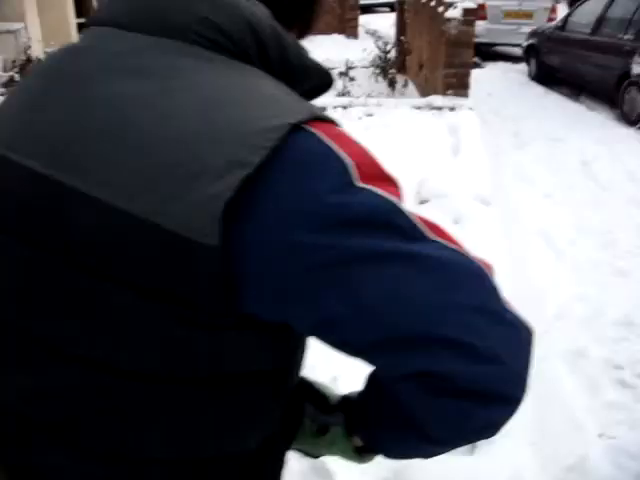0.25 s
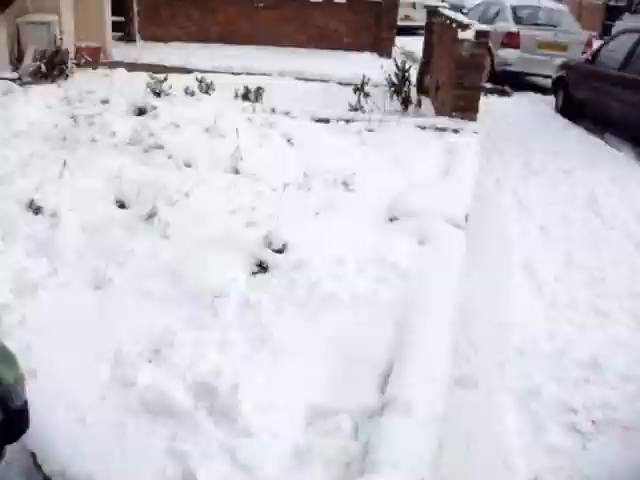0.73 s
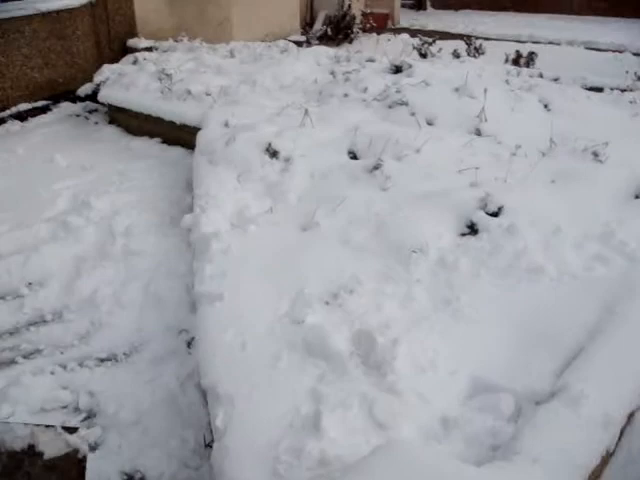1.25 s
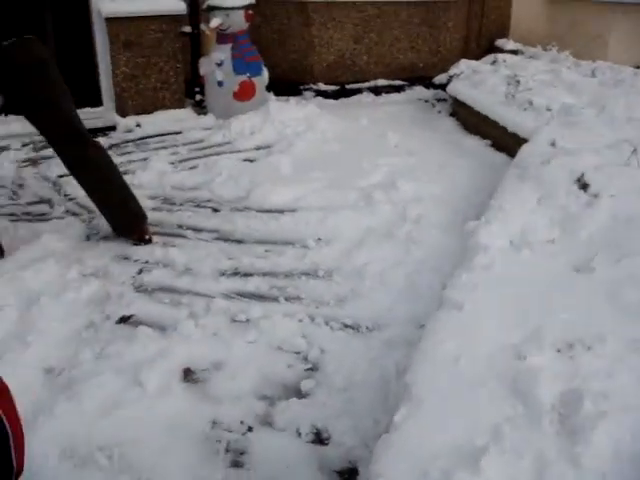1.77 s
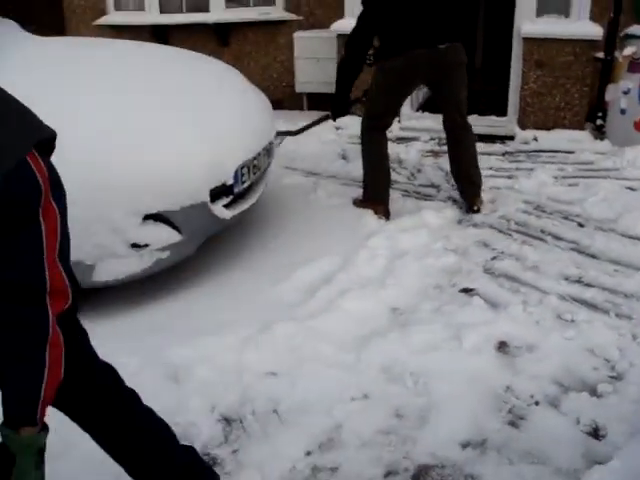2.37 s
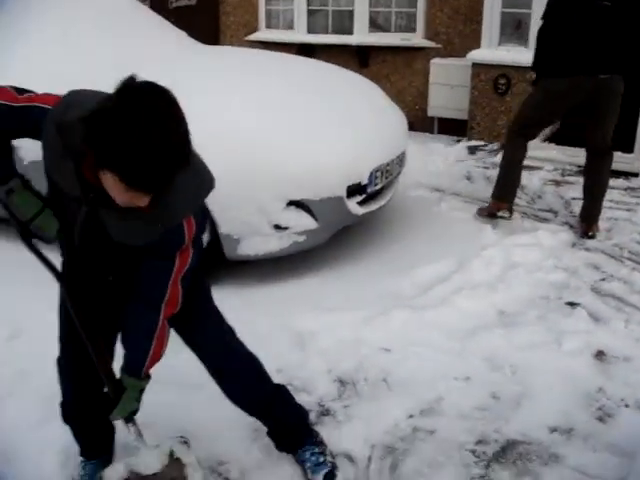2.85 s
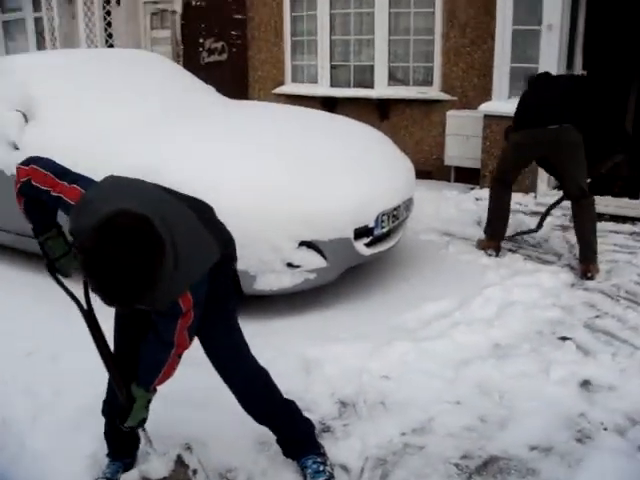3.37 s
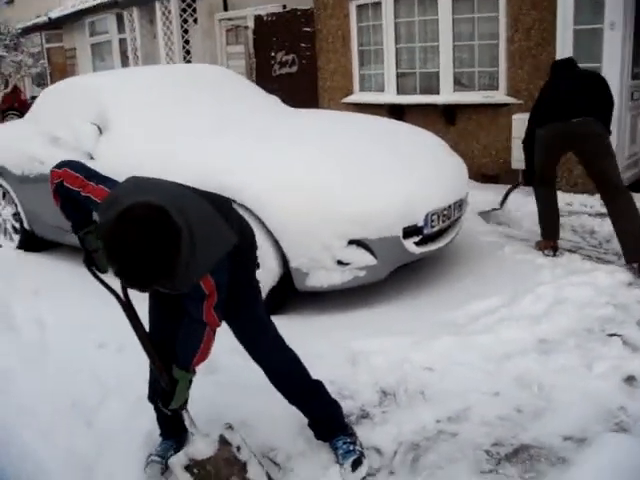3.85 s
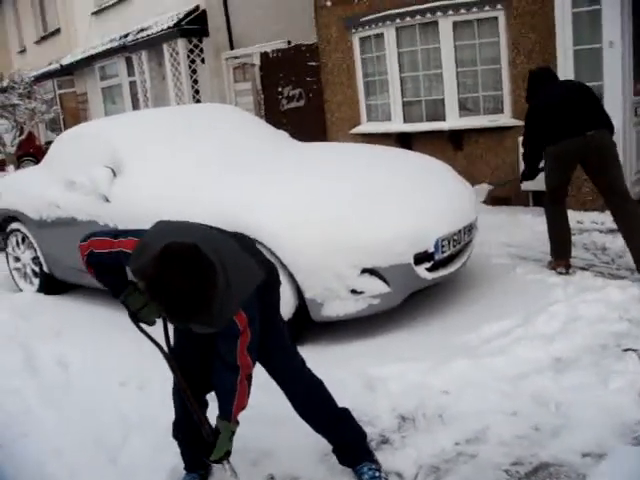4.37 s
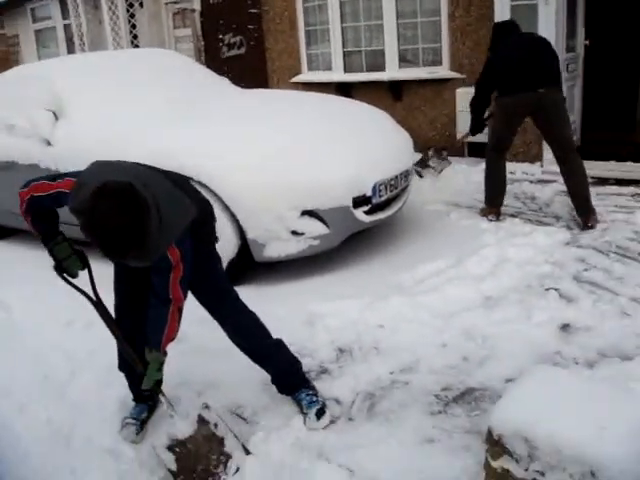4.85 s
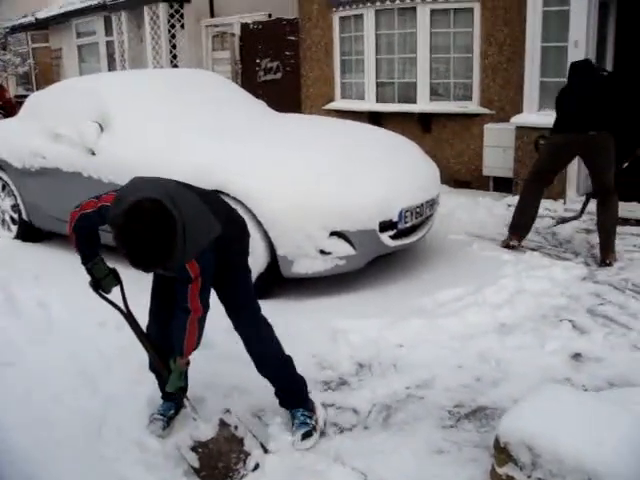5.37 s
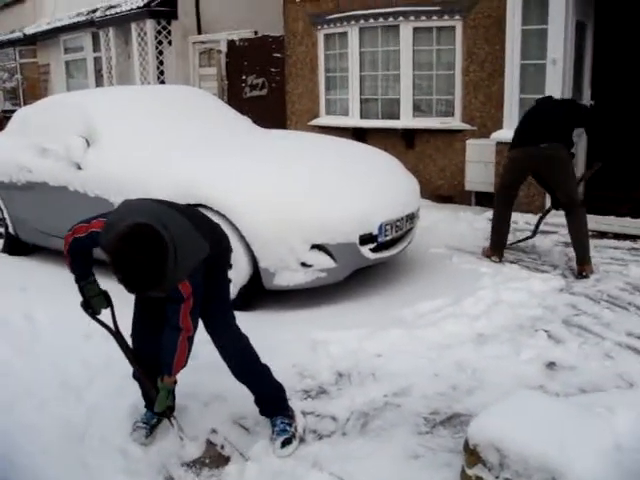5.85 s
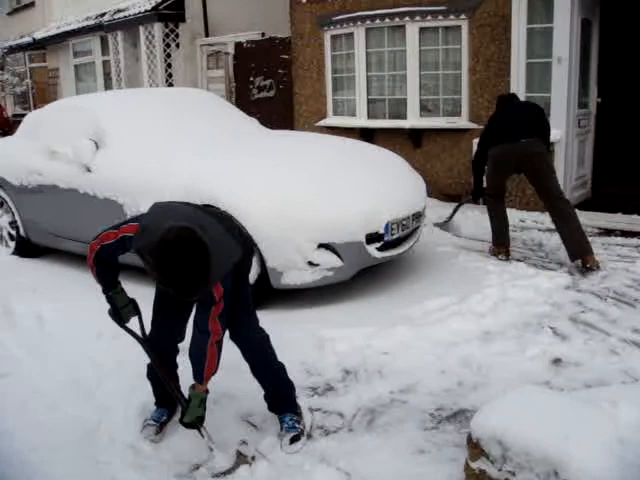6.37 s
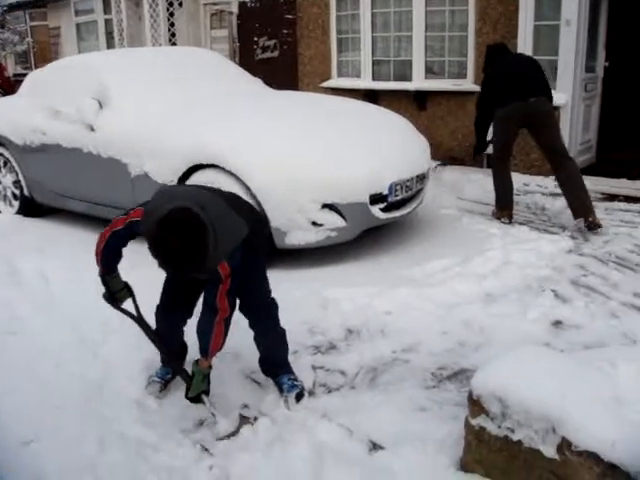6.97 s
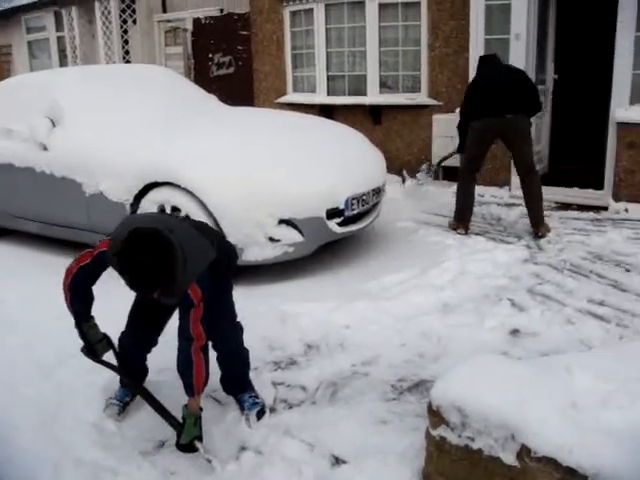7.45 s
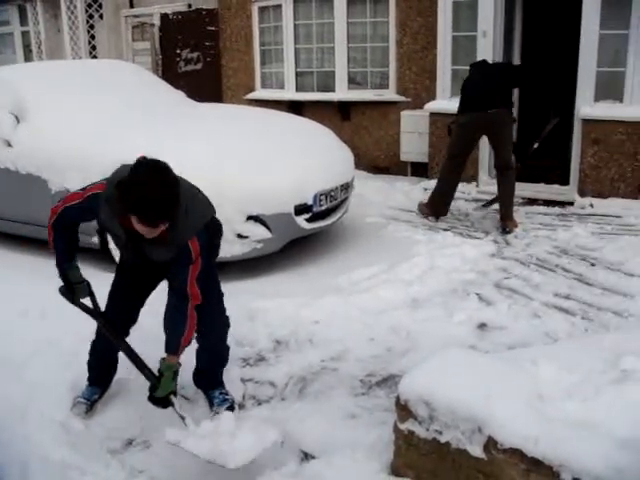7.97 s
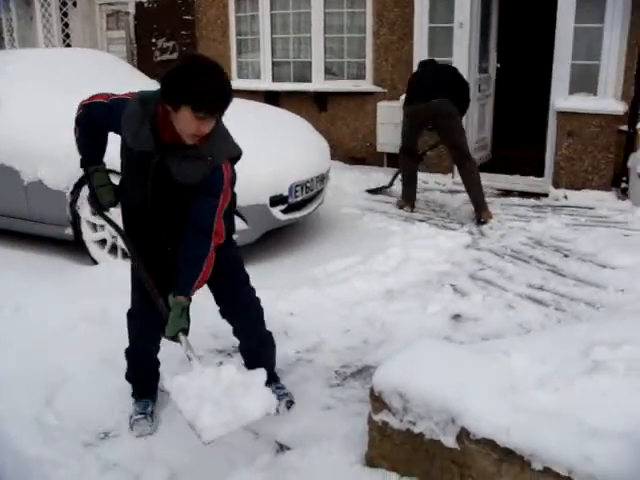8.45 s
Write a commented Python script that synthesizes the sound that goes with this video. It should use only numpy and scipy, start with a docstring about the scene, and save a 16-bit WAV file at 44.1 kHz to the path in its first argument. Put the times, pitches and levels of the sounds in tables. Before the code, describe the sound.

Steel shovel edges knock and drag on gritty paving in four short scraping strokes, each stuttering, hissing and catching with hollow metallic tones. Between them come sharp blade chops, soft snow crunches, footsteps in snow and sleeve rustle. The yard is quiet, with a faint distant murmur and thin wavering tone. A handheld microphone picks up low bumps and a little reflection from the house front.

```python
"""Paving outside a house: shovels clear snow. Steel edges scrape in long strokes, chop and bounce on the stone,
and loose snow and boots crunch between the strokes. Cloth rustles, the street murmurs, a faint tone wavers,
and wind and hands rumble at the microphone. Noise made of small grains drives the resonances of the blade,
clods are short noise clumps, and shaped noise makes the background."""
import sys
import numpy as np
from scipy import signal
from scipy.fft import rfft, irfft, next_fast_len
from scipy.io import wavfile
from scipy.ndimage import uniform_filter1d, map_coordinates

SR = 44100
rng = np.random.default_rng(int(sys.argv[2]) if len(sys.argv) > 2 else 0)


def transcribe(signal):
    """Save signal, clipped to [-1, 1], as a 16-bit WAV file at the path in sys.argv[1]."""
    frames = np.atleast_2d(signal).T
    limited = np.clip(frames, -1, 1)
    pcm = np.round(limited * 32767).astype(np.int16)
    wavfile.write(sys.argv[1], SR, pcm)


N = 384111  # length in samples

# The upper resonances of the blade. Each row: pitch in Hz, width in Hz (narrow ones are widened later),
# relative level in dB.
UPPER_MODES = [(890, 51, -24.5), (979, 22.3, 8.5), (1105, 200, -2), (1224, 15, 9.5), (1429, 40, 7),
               (1458, 13, -11.5), (1613, 37, 5.5), (1817, 25, 9.5), (2176, 37, 2.5), (2294, 17, 9),
               (2440, 35, -1), (2780, 81, -2), (2750, 26, 4), (3057, 24, 8), (3345, 19, 3), (3890, 38, 6)]
# The bright hiss of snow and edge. Each row: frequency in Hz, relative level in dB.
HISS = [(1410, -22.5), (2400, -14.5), (3130, -5), (3700, 1.5), (4220, 1), (6740, 2), (9150, -2.5),
        (10100, -10.5), (13100, -89), (22000, -120)]
# The broad grating under the resonances. Each row: frequency in Hz, relative level in dB.
BODY = [(200, -18.5), (300, -15), (400, 0.5), (700, 6.5), (1500, 4.5), (2800, 4), (4000, -46.5)]


def amp(db):
    """Turn decibels into a plain factor."""
    return 10 ** (np.asarray(db) / 20)


def unit(x):
    """Scale a sound to an rms level of 1."""
    return x / np.sqrt(np.mean(x ** 2) + 1e-20)


def along(points, hz):
    """Read a curve of (Hz, value) points on a logarithmic frequency axis."""
    f, v = np.transpose(points)
    return np.interp(np.log(hz + 1), np.log(f + 1), v)


def curves(tables):
    """Give one value per sample for each column after the time, over all tables in turn."""
    s, *columns = np.concatenate(tables).T
    return [np.interp(np.arange(N) / SR, s, column) for column in columns]


def wobble(rate, depth_db=None):
    """A smooth random curve with rate knots a second; with a depth, a gain that wavers by it."""
    step = 32  # samples between computed points
    knots = rng.standard_normal(int(N * rate / SR) + 4)
    coarse = map_coordinates(knots, [np.arange(0, N + step, step) * rate / SR])
    if depth_db is not None:
        coarse = amp(depth_db * coarse)
    return np.interp(np.arange(N) / step, np.arange(len(coarse)), coarse)


def swells(times, half, level_db, sizes=amp):
    """A curve of bell-shaped swells; sizes turns each level into a height."""
    step = 32  # samples between computed points
    t = np.arange(0, N + step, step) / SR
    bells = sum(sizes(db) * np.exp(-.5 * ((t - s) / h) ** 2) for s, h, db in zip(times, half, level_db))
    return np.interp(np.arange(N) / SR, t, bells)


def bursts(times, level_db, t60, rise):
    """An envelope that jumps at each time and dies away by 60 dB in t60 seconds."""
    out, t = np.zeros(N + SR), np.arange(SR // 4) / SR
    for s, db, life, up in np.broadcast(times, level_db, t60, rise):
        attack = (1 - np.exp(-t / max(up, 1 / SR))) ** 2
        decay = np.exp(-np.log(1000) * t / max(life, .005))
        out[round(s * SR):][:len(t)] += amp(db) * decay * attack
    return out[:N]


def filtered(x, response):
    """Multiply the spectrum of x by a response that depends on frequency."""
    m = next_fast_len(N + SR // 2)
    return irfft(rfft(x, m) * response(np.fft.rfftfreq(m, 1 / SR)), m)[..., :N]


def colour(points):
    """The response of a smooth spectrum."""
    return lambda f: amp(along(points, f))


def modes(table):
    """The response of a set of resonances; snow on the blade damps even the sharpest."""
    least_hz = 28  # no resonance is narrower

    def response(f):
        total = 0
        for k, (centre, width, db) in enumerate(table):
            loss = 1j * f * max(width, least_hz)
            total = total + (-1) ** k * amp(db) * loss / (centre * centre - f * f + loss)
        return total
    return response


def power_gain(response):
    """The rms gain of a response for white noise."""
    return np.sqrt(np.mean(np.abs(response(np.arange(1, SR // 2))) ** 2))


def driven(source, response, envelope):
    """The envelope drives a body whose steady answer to white noise has rms 1."""
    return filtered(source * envelope, response) / power_gain(response)


def shifting(table, source, envelope, depth_db, rate):
    """The contact point wanders along the edge, so every mode swells and fades on its own."""
    least_hz, never_still = 38, 1e-9  # least width of a mode; a trace of drive that never stops
    push, total = source * (envelope + never_still), 0
    for k, (hz, width_hz, db) in enumerate(table):
        b, a = signal.iirpeak(hz, hz / max(width_hz, least_hz), SR)
        total = total + (-1) ** k * amp(db) * signal.lfilter(b, a, push * wobble(rate, depth_db))
    return total / power_gain(modes(table))


def grit(per_s, spread_db, smooth):
    """Ice grains break at random moments and sizes over a smooth share of noise."""
    breaks = rng.random(N) < per_s / SR
    snaps = breaks * amp(spread_db * rng.standard_normal(N)) * rng.standard_normal(N)
    share = np.clip(smooth, 0, 1)
    return np.sqrt(1 - share) * unit(snaps) + np.sqrt(share) * rng.standard_normal(N)


def patchy(x, depth_db):
    """Make a sound louder and softer in random patches of time and frequency."""
    z = signal.stft(x, nperseg=256)[2]
    field = uniform_filter1d(uniform_filter1d(rng.standard_normal(z.shape), 5, 0), 7, 1)
    return signal.istft(z * amp(depth_db * unit(field)), nperseg=256)[1][:N]


def tone(hz, width_hz):
    """A fuzzy steady tone: noise in a narrow band around one pitch."""
    return unit(filtered(rng.standard_normal(N), lambda f: 1 / (1 + ((f - hz) / width_hz) ** 2)))


def around():
    """Street murmur, rustling cloth and snow are patchy shaped noise; a faint tone wavers."""
    # Sound between the strokes. Each row: time in seconds, murmur level in dB, rustle level in dB.
    levels = [
        [(0.0, -52, -46.5), (0.52, -49.5, -47.5), (0.722, -43.5, -44), (0.94, -48.5, -46.5), (1.17, -48, -47)],
        [(1.87, -54, -44), (2.084, -45, -43), (2.23, -43, -45), (2.512, -49, -44), (2.8, -45, -42)],
        [(2.98, -55, -46), (3.032, -46, -44.5), (3.25, -51, -57.5)],
        [(3.9, -57, -52.5), (4.094, -51, -57.5), (4.704, -53, -51), (5.276, -51, -52), (5.57, -50, -49.5)],
        [(6.47, -49, -56), (6.984, -53, -49), (7.156, -51, -44.5), (7.658, -50, -53), (8.08, -54, -43.5)],
    ]
    # Thrown snow and sleeves swish. Each row: centre in seconds, level in dB, half length in seconds.
    swishes = [(0.434, -44, 0.0097), (0.693, -45.5, 0.073), (2.318, -33.5, 0.043), (4.07, -47, 0.031),
               (4.322, -41.5, 0.023), (5.594, -40, 0.034), (6.65, -52, 0.041)]
    # The spectrum of the murmur. Each row: frequency in Hz, relative level in dB.
    murmur_colour = [(59, -48), (100, -7), (480, -4), (528, -2), (712, -2), (923, -6.5), (1000, 0),
                     (1120, -3), (2600, -19), (3380, -86.5), (5720, -120)]
    # The spectrum of the rustle. Each row: frequency in Hz, relative level in dB.
    rustle_colour = [(880, -7.5), (1500, -2), (1650, -3.5), (1800, -3.5), (1970, -3.5), (8520, -6.5),
                     (10100, -9.5), (13100, -60), (22000, -120)]
    tone_fades_s, tone_fade_db = 4.6, -7  # the faint tone is weaker from here on
    murmur_db, rustle_db = curves(levels)
    s, swish_db, half = np.transpose(swishes)
    far = grit(per_s=600, spread_db=3, smooth=.8)
    murmur = unit(filtered(patchy(far, depth_db=1.5), colour(murmur_colour)))
    murmur = murmur * wobble(6, depth_db=-0.7)
    rustle = unit(filtered(patchy(far[::-1], depth_db=2.5), colour(rustle_colour)))
    rustle = rustle * wobble(6, depth_db=1.1)
    tone_db = -60.5 + 3.3 * wobble(3) + tone_fade_db * (np.arange(N) / SR > tone_fades_s)
    return (amp(murmur_db) * murmur + (amp(rustle_db) + swells(s, half, swish_db)) * rustle
            + amp(tone_db) * tone(hz=963, width_hz=5.4))


def low_end():
    """Wind and hands buffet the microphone in lumps of low noise; a low hum comes and goes."""
    # Bumps. Each row: centre in seconds, half length in seconds, buffet level in dB, rumble level in dB.
    bumps = [(0.42, .05, -65, -46), (0.546, .03, -64, -44), (0.82, .07, -59, -47), (1.45, .04, -44, -51),
             (1.62, .06, -49, -54.5), (1.932, .03, -59, -41), (2.077, .03, -60, -48),
             (2.654, .04, -66, -38), (2.843, .05, -55, -41.5), (3.33, .05, -49, -46),
             (3.754, .02, -53, -65), (4.605, .04, -45, -52), (5.67, .04, -37, -56), (6.023, .05, -48, -69),
             (7.08, .04, -59, -56), (8.26, .03, -42, -47)]
    # Steady levels under the bumps: buffet in dB, rumble in dB, fuzzy hum in dB.
    calm_db = (-72, -72.5, -69.5)
    # A clearer hum is heard. Each row: start in seconds, end in seconds, level in dB.
    hums = [(0.606, 1.5, -54.5), (3.603, 4.504, -62.5)]
    # The spectrum of the buffeting. Each row: frequency in Hz, relative level in dB.
    buffet_colour = [(8, -12), (15, 23), (35, -0.5), (55, -22), (120, -81)]
    # The spectrum of the rumble. Each row: frequency in Hz, relative level in dB.
    rumble_colour = [(26, -39), (45, 1.5), (119, -8), (151, -6), (250, -13.5), (320, -37), (550, -120)]
    hum_hz = 122.1
    s, half, buffet_db, rumble_db = np.transpose(bumps)
    calm, t = amp(calm_db), np.arange(N) / SR
    buffet = unit(amp(3.2 * wobble(5.4)) * filtered(rng.standard_normal(N), colour(buffet_colour)))
    rumble = unit(amp(5.3 * wobble(13)) * filtered(rng.standard_normal(N), colour(rumble_colour)))
    hum_level = uniform_filter1d(sum(amp(db) * (t > a) * (t < b) for a, b, db in hums), size=6000)
    hum = np.sin(2 * np.pi * np.cumsum(hum_hz + 1.5 * wobble(6)) / SR)
    return ((calm[0] + swells(s, half, buffet_db)) * buffet
            + (calm[1] + swells(s, half, rumble_db)) * rumble
            + calm[2] * tone(hum_hz, width_hz=2.3)
            + hum_level * wobble(9.5, depth_db=2) * hum)


def chops():
    """Each blow clacks, rings the blade, thuds in the packed snow and throws up spray."""
    # The blade chops or bounces. Each row: start in seconds, blow level in dB, thud in dB over the blow,
    # belly mode in dB over the blow, belly mode in Hz, clack in Hz, spray in dB over the blow,
    # basic decay time in seconds (each layer takes its own share of it).
    blows = [(0.163, -4, -7.5, -14, 649, 1630, -5, 0.11), (1.1914, -10, -40, -2.5, 563, 2420, -2.5, 0.07),
             (1.2241, -17.5, -24, -4, 537, 900, -1, .11), (2.8345, -3, -20, -0.5, 600, 940, -4, 0.091),
             (2.8877, -12, -5, 9, 610, 950, 1, 0.087), (3.026, -41, -14, 13, 597, 961, -6, .16),
             (3.055, -35.5, -15, 4, 598, 904, 3, 0.12), (3.2246, -18, -16, 10, 550, 1000, -8.5, .077),
             (3.2908, -14, -45, 5.5, 542, 2770, -15, 0.072), (4.585, -2.5, -16.5, -24, 685, 2220, -4, 0.1),
             (4.6055, -22.5, 3.5, -8, 500, 2320, -0.5, .1), (4.639, -30.5, -5, -7, 603, 1670, 10, 0.17),
             (4.736, -24, -33, -33, 514, 2280, 0, 0.13), (5.5995, -10, -36, 2, 570, 1260, 9.5, 0.06),
             (5.628, -10, -30, 2, 556, 1260, -3, .07), (7.0621, -2, -12, -18.5, 513, 2200, -3.5, 0.079),
             (7.0695, -9.5, -13, -10, 487, 2150, 7, 0.065), (8.1085, -11.5, -40, 6, 567, 1300, -2, .055),
             (8.1385, -10, -30, -1, 575, 1540, -3, .08)]
    s, db, thud_db, belly_db, belly_hz, clack_hz, spray_db, t60 = np.transpose(blows)
    # a blow that thuds less glances off the stone and starts more softly: seconds, seconds per dB
    rise = 0.0008 + 0.00006 * np.abs(thud_db)
    blow = grit(per_s=5000, spread_db=1, smooth=0.41)
    shake = bursts(s, db - 16.0, t60, rise) + bursts(s, db - 5, 0.14 * t60, rise)
    knock, t = np.zeros(N + SR), np.arange(SR // 4) / SR
    for start, peak_db, low_db, low_hz, hz, life, up in zip(s, db, belly_db, belly_hz, clack_hz, t60, rise):
        fade = amp(-60 * t / life) * (1 - np.exp(-t / up)) ** 2
        turn = 2 * np.pi * low_hz * t
        belly = np.sin(turn) + 0.48 * np.sin(1.09 * turn) + 0.39 * np.sin(.9 * turn)  # close modes beat
        # the mode nearest the blow
        clack = unit(signal.lfilter(*signal.iirpeak(hz, 9, SR), rng.standard_normal(len(t))))
        hit = amp(low_db) * belly * fade ** 1.26 + amp(-10) * clack * fade ** 0.87
        knock[round(start * SR):][:len(t)] += amp(peak_db) * hit
    ringing = shifting(UPPER_MODES, blow, shake, depth_db=4, rate=5)
    thud_body = modes([(242, 79, 5.3), (389, 21, 1.1)])
    thud = driven(blow, thud_body, bursts(s, db + thud_db, 0.77 * t60, rise))
    spray = driven(patchy(blow, depth_db=2.5), colour(HISS), bursts(s, db + spray_db, 0.42 * t60, rise))
    return knock[:N] + amp(-1.0) * ringing + amp(2.5) * driven(blow, colour(BODY), shake) + thud + spray


def crunches():
    """Each clod is a clump of grains through a broad resonance, with a bright snap in front."""
    # Clods of snow and boots. Each row: start in seconds, clump peak in dB, pitch in Hz,
    # snap in dB over the clump (before it is brightened), decay time of the clump in seconds.
    clods = [(0.407, -31, 149, -11, .07), (0.428, -39.5, 1470, 15.5, .055), (0.7775, -19, 1000, -20, .015),
             (0.8, -21, 2150, -10, .015), (0.827, -17, 1270, -8, .018), (0.846, -24, 447, -29, .03),
             (0.887, -17.5, 2090, -12, .018), (0.98, -30, 3000, -20, .015), (0.992, -27, 1500, -25, .015),
             (1.829, -29, 1060, -5, .045), (2.049, -27.5, 705, -6.5, .04), (2.094, -27, 490, -12, .05),
             (2.351, -21, 1070, -5, .04), (3.18, -20, 2050, -12, .02), (4.336, -24.5, 950, -22.5, .1),
             (4.353, -20, 308, -10, .037), (4.858, -30, 156, -9.5, .06), (4.878, -27.5, 400, -26, .08),
             (5.05, -39, 304, -22, .06), (5.29, -40, 1410, -10, .07), (6.394, -22, 870, -20, .06),
             (6.408, -20, 790, -16, .06), (7.17, -32, 220, -4, .06), (7.425, -40, 200, -25, .06),
             (7.457, -27, 600, -30, .08), (7.485, -30, 900, -26, .06), (7.533, -24, 710, -30, .06),
             (7.606, -24, 600, -28, .07), (7.731, -12, 800, -38, .05), (7.79, -32, 904, -5, .04),
             (8.65, -16, 1390, -5, .04)]
    small_clods = 24  # these fall at random moments
    out, t = np.zeros(N + SR), np.arange(SR // 5) / SR
    when = rng.random(small_clods)
    size, pitch = rng.standard_normal((small_clods, 2)).T
    small = [(u * N / SR, -43 + 2.5 * a, 450 * np.exp(0.65 * b), -15, .05)
             for u, a, b in zip(when, size, pitch)]
    tick_s, tick_db = 0.001, 1.5  # the first crack of a clod: length, level over its clump
    for s, db, hz, snap_db, t60 in clods + small:
        b, a = signal.iirpeak(np.clip(hz, 80, 8000), .8, SR)
        grains, snap = rng.standard_normal((2, len(t)))
        envelope = amp(-60 * t / t60) + amp(tick_db) * np.exp(-t / tick_s)
        knock = signal.lfilter(b, a, envelope * grains)
        clump = signal.lfilter(b, a, knock) + amp(-29) * knock  # a weaker, wider skirt
        # differences between samples make the snap bright
        snap = np.diff(snap, prepend=0) * amp(snap_db - 60 * t / (0.35 * t60))
        out[round(s * SR):][:len(t)] += amp(db) * (clump / np.abs(clump).max() + snap)
    return out[:N]


def touching(tables):
    """One while any stroke lasts, with soft ends."""
    t = np.arange(N) / SR
    return uniform_filter1d(sum(1. * (t >= rows[0][0]) * (t <= rows[-1][0]) for rows in tables), size=300)


def singing(source, hz, width_hz, steady):
    """A mode of moving pitch; stick and slip lock on to it, which evens out its level."""
    turn = np.exp(2j * np.pi * np.cumsum(hz) / SR)
    pole = np.exp(-np.pi * width_hz / SR)
    # shift the mode down to 0 Hz, smooth it there, then shift it back
    smoothed = signal.lfilter([1], [1, -pole ** 4], source / turn)
    rest = signal.lfilter([1], [1, -pole], smoothed)
    return unit(np.real(rest / np.abs(rest) ** np.clip(steady, 0, .9) * turn))


def scrape():
    """The edge drags over gritty stone, stutters and catches; the grains drive every mode of the blade."""
    # One table per stroke. Each row: time in seconds, grating level in dB, hiss in dB over the grating.
    strokes = [
        [(1.22, -38, -1), (1.23, -22, -2), (1.472, -15.5, -2), (1.504, -15.5, -4), (1.534, -14, -5.5),
         (1.564, -16.5, -7.5), (1.592, -14.5, -10), (1.612, -16.5, -1), (1.67, -18, -3.5), (1.752, -23.5, -9.5),
         (1.86, -54.5, 0.5)],
        [(3.28, -34, 0), (3.288, -16, 3), (3.33, -19, 1), (3.352, -16.5, -25.5), (3.364, -16.5, 7.5),
         (3.386, -19, -3.5), (3.584, -23.5, 0), (3.634, -16.5, -5.5), (3.798, -24, -3), (3.836, -52, -7),
         (3.9, -58, -8)],
        [(5.643, -24.5, 6), (5.673, -17, 2.5), (5.831, -25, -0.5), (6.131, -19, 2), (6.185, -27, 3),
         (6.223, -19, -2.5), (6.239, -20, 2.5), (6.315, -18.5, -2.5), (6.373, -29, -11), (6.403, -28, -5.5),
         (6.46, -74, -10)],
        [(8.155, -19, -11), (8.161, -15.5, -3), (8.235, -16, 0.5), (8.253, -23.5, -5.5), (8.261, -19.5, 2.5),
         (8.307, -16.5, -1), (8.485, -25.5, 6.5), (8.491, -21.5, 2), (8.609, -24.5, 0.5), (8.697, -60, -15.5),
         (8.71, -51, -2)],
    ]
    # One row per stroke: share by which its load of snow shifts the pitch of the lowest two modes,
    # low rasp at mid-stroke in dB over the grating.
    loads = [(-0.055, -17), (-0.005, -24), (0.02, -27.5), (0.025, -25)]
    # The edge skips off the stone for a moment. Each row: centre in seconds, half length in seconds,
    # dip of the level in dB.
    skips = [(3.338, 0.0047, -3), (3.405, .006, -13), (5.665, 0.0022, -5.5), (5.684, 0.0019, -11),
             (5.711, .003, -7), (5.771, 0.0075, -10), (6.079, 0.0063, -16.5), (6.167, 0.0089, -5),
             (6.346, 0.0091, -7.5), (8.175, 0.0031, -5), (8.252, 0.0055, -10)]
    # The edge catches on joints in the paving. Each row: start in seconds, level of the catch in dB,
    # level of the lowest mode in dB.
    catches = [(1.2684, -18, -11), (1.34, -37, -11), (1.4, -19.5, -15), (1.4604, -21.5, -16.5),
               (1.5898, -29.5, -3), (1.6814, -28, -35), (1.7397, -21, -45), (3.3444, -31.5, -15),
               (3.3786, -13.5, -24.5), (3.4095, -8, -13), (3.4467, -26, -20), (3.599, -32, -25),
               (3.785, -7.5, -45), (5.722, -11.5, -24), (5.949, -17.5, -23.5), (5.9786, -37.5, -17),
               (6.049, -21, -14.5), (6.0974, -20.5, -22.5), (6.1185, -19.5, -15.5), (8.16, -30, -23),
               (8.217, -35, -11), (8.261, -16, -21.5), (8.488, -30, -24)]
    # Five modes that sing while the edge drags. Each row: pitch at mid-stroke in Hz (before load and wander),
    # width in Hz, bend over a stroke in Hz, wander in Hz, level in dB over the grating (before it flickers).
    singers = [(544, 71, 5, 22, -16), (745, 34, 110, 7.7, -15), (978, 35, 5, 16, -18.5),
               (1300, 45, 23, 23, -18.5), (1983, 44, 70, 38, -19)]
    # One table per singing mode: the spells when stick and slip lock on to it. Each row: centre in seconds,
    # half length in seconds, level in dB over the grating (before it flickers).
    spells_of_modes = [
        [(1.43, 0.018, -6.5), (1.55, 0.011, -8.5), (3.55, 0.021, -6), (3.66, 0.027, -11), (5.69, 0.027, -12),
         (8.31, 0.028, -18)],
        [(1.26, 0.016, -2.5), (1.6, 0.016, -8), (1.69, .03, -5), (3.7, 0.055, -4), (6.02, 0.033, -2.5),
         (6.12, 0.018, -2.5), (6.22, 0.023, -1.5), (8.31, 0.023, -12), (8.39, 0.037, -4), (8.5, 0.077, -13)],
        [(1.27, .015, -10), (1.47, 0.022, -12.5), (1.54, 0.018, -2.5), (1.68, 0.019, -8.5), (3.56, 0.044, -15),
         (5.68, 0.023, -8)],
        [(1.4, 0.0098, -16), (3.42, 0.016, -9), (5.7, 0.048, -7.5), (6.26, 0.061, -10), (8.23, 0.022, -8.5),
         (8.42, 0.019, -6), (8.53, .04, -8.5)],
        [(1.33, 0.016, -12), (1.6, .02, -13.5), (3.51, .025, -7), (3.73, 0.05, -8), (6.0, 0.088, -7.5),
         (6.3, 0.012, -5), (8.33, 0.056, -3)],
    ]
    # The spectrum of the low rasp. Each row: frequency in Hz, relative level in dB.
    rasp_colour = [(150, -33), (230, -19), (330, 5), (430, -0.5), (520, -6.5), (900, -47)]
    grate_db, hiss_db = curves(strokes)
    stroke_ends = [[(rows[0][0], -.5, *load), (rows[-1][0], .5, *load)] for rows, load in zip(strokes, loads)]
    progress, load, rasp_db = curves(stroke_ends)  # progress is 0 at mid-stroke
    stutter = amp(0.72 * wobble(45) + 1.23 * wobble(130))
    skip = amp(-swells(*np.transpose(skips), sizes=np.abs))
    drag = touching(strokes) * amp(grate_db) * stutter * skip
    s, catch_db, catch_low_db = np.transpose(catches)
    catch = bursts(s, catch_db, t60=0.025, rise=0.00026)
    edge = patchy(grit(per_s=6000, spread_db=1.5, smooth=0.73), depth_db=2.0)
    sung = 0
    for k, ((hz, width_hz, bend_hz, wander_hz, db), spells) in enumerate(zip(singers, spells_of_modes)):
        flicker = np.minimum(wobble(32, depth_db=6), 1.3)
        level = drag * (amp(db) + swells(*np.transpose(spells))) * flicker
        if k == 0:
            level = level + bursts(s, catch_low_db, t60=0.034, rise=0.001)
        pitch = hz * (1 + load * (k < 2)) + bend_hz * progress + wander_hz * wobble(9)
        sung = sung + level * singing(edge, pitch, width_hz, steady=.45)
    ringing = shifting(UPPER_MODES, edge, drag + catch, depth_db=3, rate=11)
    grating = driven(edge, colour(BODY), drag + catch)
    rasp_db = rasp_db + 11 * progress + 3.4 * wobble(12)  # grows by 11 dB over a stroke
    rasp = driven(edge, colour(rasp_colour), drag * amp(rasp_db))
    # the hiss wavers quickly in level
    flutter = np.minimum(wobble(30, depth_db=2.5), 1.2) * wobble(70, depth_db=1.5)
    hiss = driven(patchy(edge, depth_db=2.5), colour(HISS), drag * amp(hiss_db) * flutter + catch)
    return sung + amp(-7.5) * ringing + amp(-6) * grating + rasp + hiss


def yard(x):
    """House front and garden walls answer with a noise tail; each frequency dies at its own speed."""
    # The echo of the yard. Each row: frequency in Hz, time to fade by 60 dB in seconds.
    fade_times = [(200, 0.37), (2000, 0.38), (10000, 0.051)]
    hz, t, z = signal.stft(rng.standard_normal(SR // 2), SR, nperseg=256)
    tail = signal.istft(z * amp(-60 * t / along(fade_times, hz)[:, None]), SR, nperseg=256)[1]
    return signal.fftconvolve(np.pad(x, (500, 0)), tail / np.linalg.norm(tail))[:N]  # 500 samples late


def scene():
    """Add the shovels with their echo, the surroundings and the low sounds."""
    shovels = scrape() + chops() + crunches()
    # the shovels carry little deep bass: below about 140 Hz they fall away steeply
    heard = filtered(shovels + amp(-17.5) * yard(shovels), lambda hz: (1j * hz / (140 + 1j * hz)) ** 2)
    return (heard + around() + low_end())[None]


def record(dry):
    """Round off the highest peaks and keep nothing above the band limit."""
    top_hz = 10220
    rounded = dry / (1 + np.abs(dry / .62) ** 4) ** (1 / 4)
    return filtered(rounded, lambda hz: hz < top_hz)


dry = scene()
out = record(dry)
transcribe(out)
```